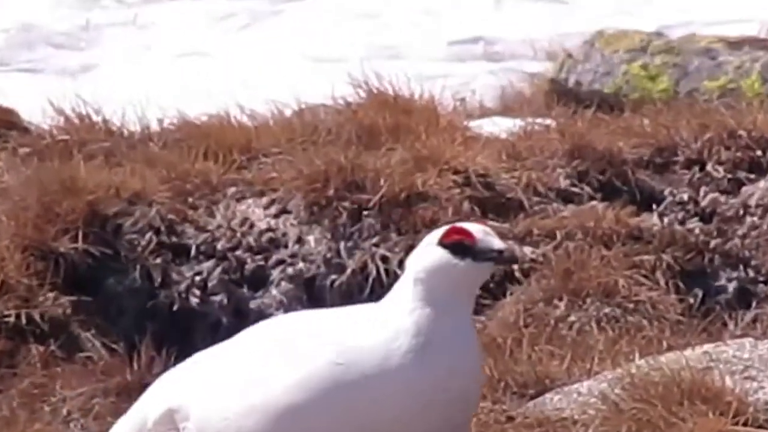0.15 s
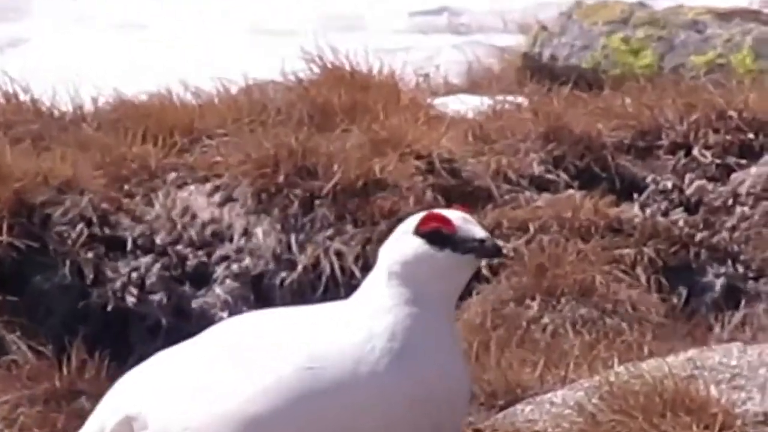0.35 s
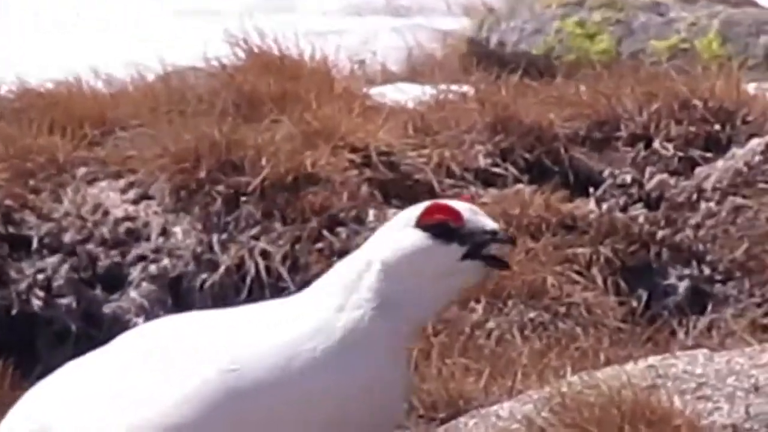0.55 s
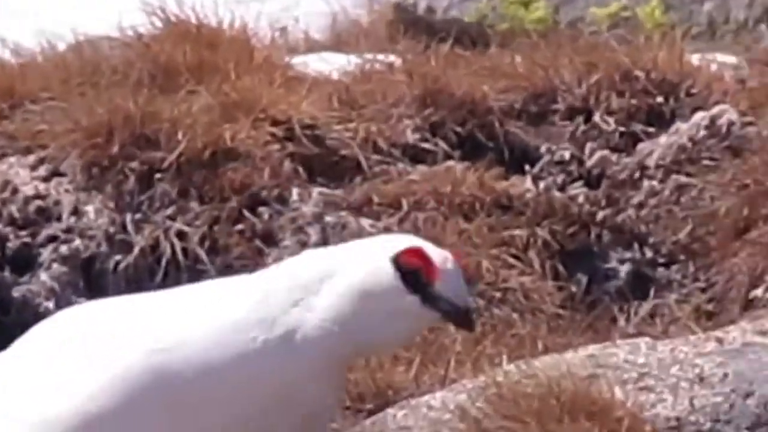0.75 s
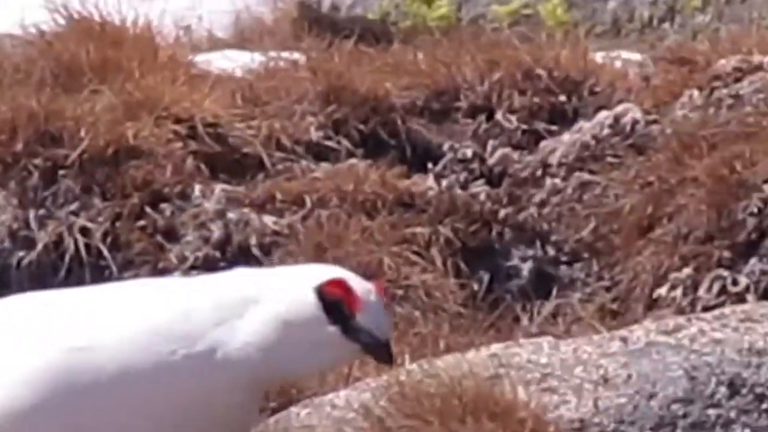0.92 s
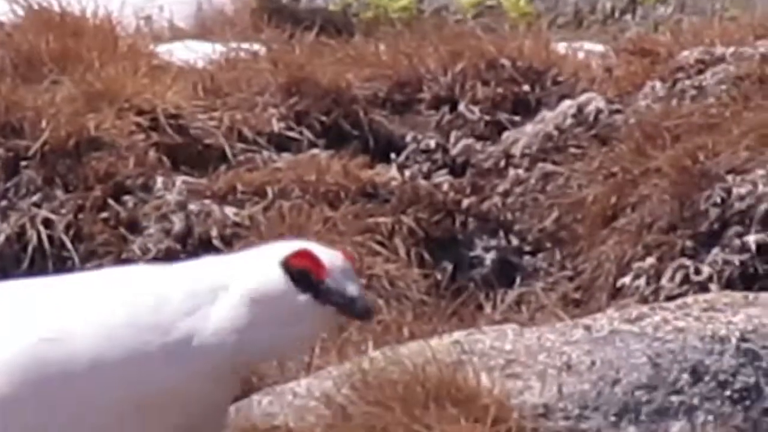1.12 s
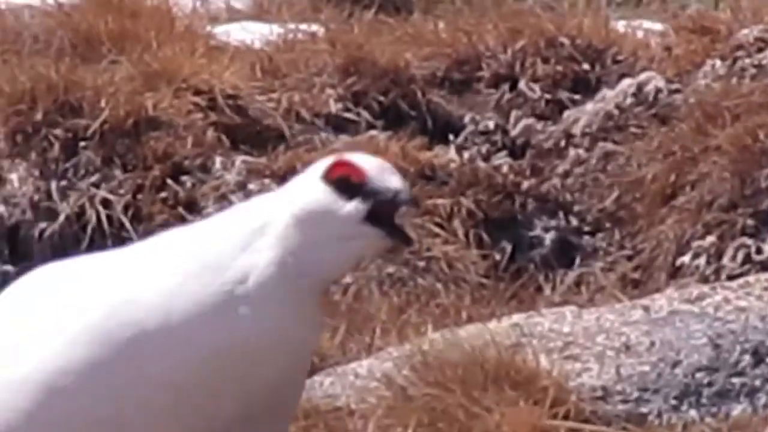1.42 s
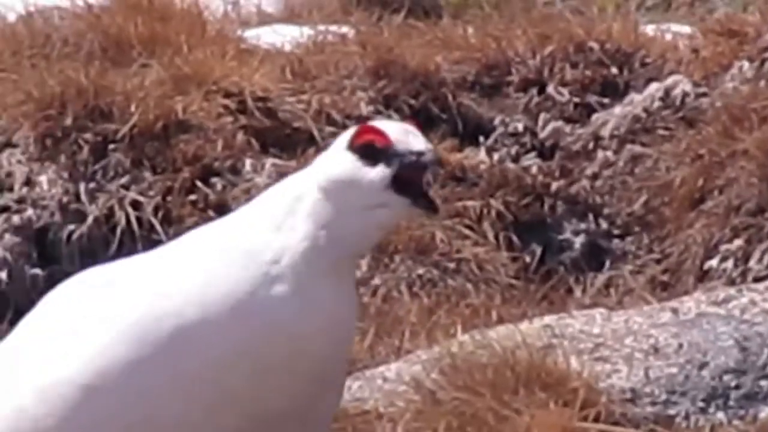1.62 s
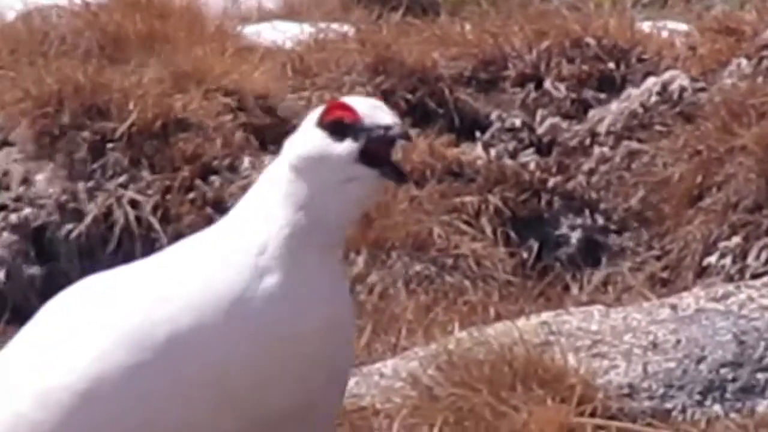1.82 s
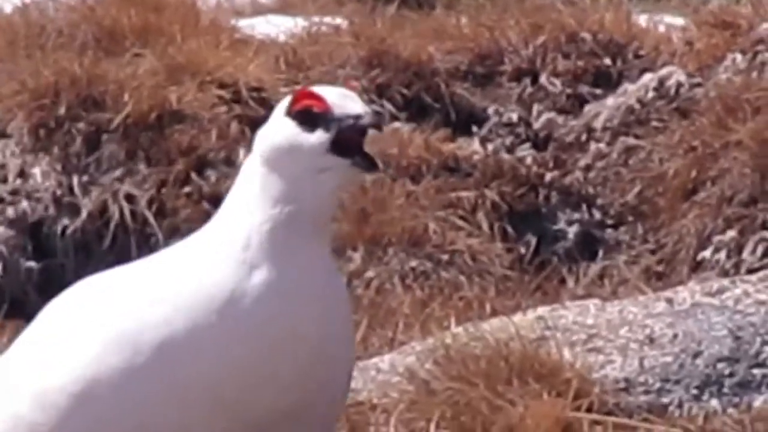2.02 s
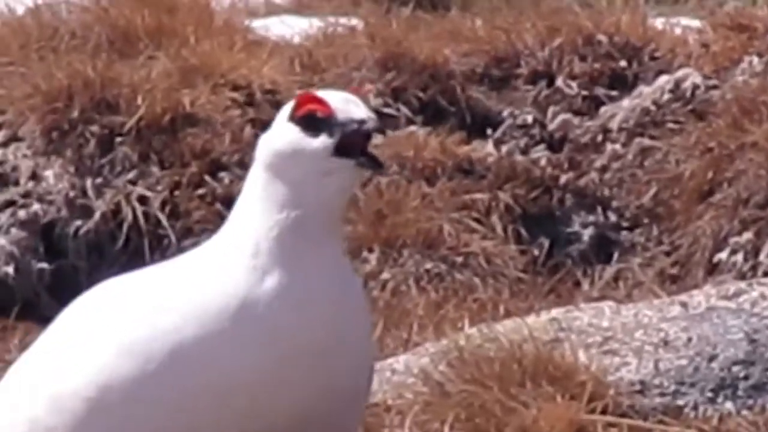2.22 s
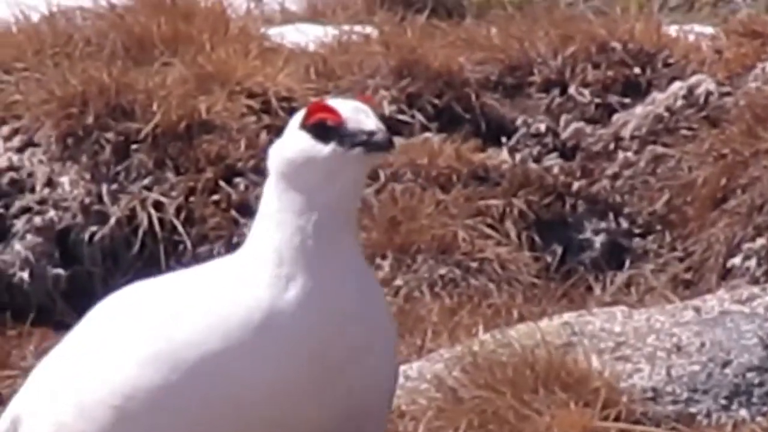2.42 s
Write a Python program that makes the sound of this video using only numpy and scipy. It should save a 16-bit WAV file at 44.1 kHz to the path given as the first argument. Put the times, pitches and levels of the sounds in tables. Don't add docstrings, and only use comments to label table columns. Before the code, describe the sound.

A ptarmigan's dry, guttural clicking call over soft wind hiss on an open slope. Low wind buffets hit the microphone around 0.2 s; fingers rub the plastic housing, which snaps very loudly at 0.4 s with a brief hum. A croak of separate throat clicks runs 0.8-1.55 s, weak midway, with faint grass rustles. From 1.68 to 2.4 s a steady, hollow rattle swells, rises, then stops, leaving hiss.

```python
import sys
import numpy as np
from scipy import signal
from scipy.io import wavfile
from scipy.ndimage import uniform_filter1d

SR = 44100
rng = np.random.default_rng(int(sys.argv[2]) if len(sys.argv) > 2 else 0)


def volts_from_decibels(level):
    exponent = np.asarray(level, float) / 20
    return 10 ** exponent


def persist_wave(psi):
    counts = np.round(np.clip(psi, -1, 1) * 32767).astype(np.int16)
    wavfile.write(sys.argv[1], SR, np.atleast_2d(counts).T)


N = 112454

# freq_hz, level_db (per Hz)
HISS_SPECTRUM = [(18, -21.5), (30, 0.5), (278, -14), (308, -7), (352, -14.5), (469, -14), (695, -17),
                 (9040, -36.5), (15700, -47.5)]
# freq_hz, likeness (-1 opposed .. 1 same)
PORT_LIKENESS = [(60, -0.66), (180, -0.9), (550, -0.511), (1650, -0.29), (4970, 0.03), (15000, 0.13)]
# start_s, length_s, level_db, pitch_hz, port (-1 right .. 1 left)
GUSTS = [(.186, .13, -20.5, 48, -.85), (.201, .14, -23, 108.5, -.8), (.218, .033, -13, 122.5, -.97),
         (.207, .041, -19.5, 44.5, -.62), (.327, .037, -26.5, 132, .73), (.867, .016, -35, 740, .69),
         (.878, .027, -32, 146, .5), (.388, .03, -30, 70, .86), (.978, .029, -27, 97, .59),
         (1.289, .092, -36.5, 60, -.39), (1.315, .014, -42, 110, .6), (1.675, .062, -32, 60, -.35),
         (1.757, .035, -30, 100, -.31), (2.012, .044, -44, 59.5, .88), (2.261, .079, -39, 65.4, .1),
         (0.0, .068, -44, 40, -.013), (.886, .009, -35, 300, .6), (.873, .02, -43, 620, .6)]
# pitch_hz, level_db, t60_s, right_port_phase_turns
SHELL_MODES = [(575, -19, 0.021, 0.39), (671, -7, 0.021, 0.45), (860, -5, 0.017, 0.45),
               (1150, -17, 0.027, 0.46), (1393, 0.5, 0.012, 0.29), (1579, -4.5, 0.019, 0.22),
               (2126, -13, 0.012, 0.22), (2490, -11.5, 0.01, 0.26), (3290, -14.5, 0.0086, 0.085),
               (4230, -11.5, 0.00885, 0.12), (4785, -11, 0.013, 0.67), (7450, -36, .008, 0.54),
               (9730, -26, 0.011, 0.18), (11610, -19, 0.0055, 0.24)]
# start_s, level_db, brightness_db_per_octave
SNAPS = [(.4047, -10.5, 5.5), (.4055, 6, -1.1), (.4128, -12, -5), (.4255, -31.5, -10), (0.3933, -17, -1),
         (0.3969, -18.5, -2), (.4, -19.5, 5), (.4025, -19.5, 3.5), (.4092, -12, 0.5), (.4165, -19.5, -12),
         (.643, -36, -1), (1.021, -36, -2.5), (.082, -40.5, 0)]
# time_s, level_db
HAND_CREEP = [
    (0.201, -56.5),
    (0.239, -45),
    (0.319, -42),
    (.33, -49),
    (.345, -41.5),
    (0.384, -45.5),
    (0.39, -37.5),
    (.404, -20.5),
    (0.4156, -34),
]
# pitch_hz, width_hz, level_db
GRIP_RINGS = [(674, 67, 29), (1378, 74, 13), (2400, 86, -5.5), (3800, 65, -18), (4200, 79, -19),
              (4520, 58, -20)]
# pitch_hz, width_hz, level_db
AFTER_RINGS = [(990, 49, -38.5), (1580, 90, -43), (1709, 81, -36.5), (868, 30, -52.5), (2330, 60, -46.5)]
# start_s, level_db, length_s, brightness_db_per_octave
SLIPS = [(0.2257, -43.5, .005, 0.5), (.251, -46, .006, -5), (0.289, -39, 0.0042, -0.5),
         (.307, -47, .008, 2), (0.332, -48.5, .004, 0), (.343, -45.5, .006, 0), (0.356, -42.5, .008, -2.5),
         (.368, -44, .006, -5), (0.377, -43.5, .005, -3)]
# pitch_hz, width_hz, level_db
SLIP_RINGS = [(1405, 260, 0), (2380, 120, -9), (4300, 400, -13.5), (800, 330, -5.5)]
CROAK_CLICKS = [0, 1, 2, 3, 8, 14, 16, 17, 18, 19]
# start_s, effort_db, throat_hz, beak_hz, beak_ring_db, brightness_db
CROAK = [
    (0.778, -48, 1110, 2267, 8.5, 0),
    (0.8126, -29.5, 1080, 2170, 3, -12),
    (0.8497, -34.5, 924, 2000, -4, -10),
    (0.8938, -40, 900, 1970, -11, -5),
    (1.118, -49.5, 890, 1730, -5, -3),
    (1.362, -45.5, 880, 1740, -7, -3),
    (1.4373, -38, 1105, 1840, -9, 2),
    (1.472, -34, 1150, 1900, -13, 8),
    (1.506, -31.5, 1227, 2270, -0.5, 8),
    (1.539, -37.5, 1210, 2290, 1, 10),
]
# start_s, effort_db, throat_hz, beak_hz, beak_ring_db, brightness_db
RATTLE = [(1.6792, -33, 1180, 2224, 3, -3), (1.7046, -31.5, 1130, 2244, 2, 3),
          (1.7347, -33.5, 1150, 2240, 1, 8), (1.7651, -34, 1150, 2240, -4, -1),
          (1.7962, -33.5, 1150, 2210, -10, -6), (1.8254, -32.5, 1150, 2250, -8, 7),
          (1.8547, -33, 1180, 2200, -10, -2), (1.8828, -31.5, 1194, 2220, -7, 1),
          (1.9108, -30, 1170, 2270, -4, 5), (1.9387, -30.5, 1180, 2220, 1, -2),
          (1.9661, -30, 1230, 2285, 4.5, -2), (1.993, -30, 1245, 2350, 6, -1),
          (2.02, -28.5, 1243, 2293, 5.5, -10), (2.0477, -28, 1285, 2337, 7.5, -9),
          (2.073, -28.5, 1300, 2344, 6.5, -7), (2.101, -27, 1336, 2285, 7.5, -6),
          (2.1274, -26.5, 1320, 2270, 5.5, 5), (2.1539, -26, 1326, 2310, 5, -7),
          (2.1798, -28, 1373, 2306, 4.5, 1), (2.2077, -26.5, 1320, 2290, 4, -4),
          (2.235, -27, 1350, 2330, 3.5, 6), (2.263, -26.5, 1324, 2335, 2.5, 6.5),
          (2.2916, -28, 1300, 2280, 2, 1), (2.3207, -27.5, 1320, 2195, 5.5, 4),
          (2.3492, -28, 1263, 2246, 6, 3), (2.3796, -30, 1266, 2240, 7, 6)]
# start_s, length_s, level_db, pitch_hz
RUSTLES = [(1.154, 0.018, -54.5, 3540), (1.153, 0.022, -54.5, 2180), (1.155, 0.012, -56.5, 4300),
           (1.171, 0.0157, -52.5, 3517), (1.175, 0.018, -57, 2280), (1.287, 0.012, -51, 3590),
           (1.281, 0.023, -59.5, 2460), (1.285, 0.0095, -87, 5040)]


def read(points, hz):
    f, value = np.transpose(points)
    return np.interp(np.log(hz + 1), np.log(f + 1), value)


def evened(x):
    return x / np.sqrt(np.mean(x ** 2) + 1e-20)


def add(mix, s, sound):
    part = mix[..., round(s * SR):][..., :sound.shape[-1]]
    part += sound[..., :part.shape[-1]]


def ring(t, hz, db, t60):
    phase = 2 * np.pi * np.cumsum(hz * np.ones(len(t))) / SR
    return volts_from_decibels(db - 60 * t / t60) * np.sin(phase)


def band(x, hz, width):
    return signal.lfilter(*signal.iirpeak(hz, max(hz / width, .3), SR), x)


def sharp_band(x, hz, width):
    return band(band(x, hz, width), hz, width)


def hiss():
    frames, hz = N // 256 + 5, np.fft.rfftfreq(1024, 1 / SR)
    a, b, c, d, patches = rng.standard_normal((frames, 513, 5)).T
    patches = uniform_filter1d(patches, size=10, axis=0)
    patches = evened(uniform_filter1d(patches, size=8, axis=1))
    lumpy_db = 0.71 + 1.13 / (1 + (hz / 200) ** 2)
    same = np.clip(read(PORT_LIKENESS, hz), -.98, .98)[:, None]
    mid = a + 1j * b
    side = (c + 1j * d) * np.sqrt((1 - same) / (1 + same))
    level_db = read(HISS_SPECTRUM, hz)[:, None] + lumpy_db[:, None] * patches
    z = np.array([mid, side]) * volts_from_decibels(level_db)
    mid, side = signal.istft(z, nperseg=1024, noverlap=768)[1][:, :N]
    scale = volts_from_decibels(-47.5) / np.sqrt(np.mean(mid ** 2))
    return scale * np.array([(mid + side) * volts_from_decibels(0.9), (mid - side) * volts_from_decibels(-0.6)])


def gusts():
    widen = 0.52
    out = np.zeros((2, N))
    for s, length, db, hz, port in GUSTS:
        t = np.arange(0, length, 1 / SR)
        low = sharp_band(rng.standard_normal(16000), hz, 0.49 * hz)
        low = low[6000:][:len(t)]
        swell = np.sin(np.pi * (t / length) ** 0.73) ** 2
        lump = volts_from_decibels(db) * evened(low * swell)
        left, right = (1 + port) / 2, (1 - port) / 2
        gains = [1, -1]
        if abs(port) > .3:
            gains = [left - widen * right, right - widen * left]
        add(out, s, np.outer(gains, lump))
    return out


def snaps():
    rise_s = 0.00027
    out, t = np.zeros((2, N)), np.arange(3000) / SR
    for s, db, tilt_db in SNAPS:
        luck = rng.standard_normal((len(SHELL_MODES), 3))
        tick = rng.standard_normal((2, 3000)) * np.exp(-t / 0.00036)
        sound = volts_from_decibels(-22.0 + 1.5 * tilt_db) * tick
        for (hz, mode_db, t60, turns), draw in zip(SHELL_MODES, luck):
            level_db = mode_db + tilt_db * np.log2(hz / 1450) + 2 * draw[0]
            pitch_hz = hz * (1 + 0.018 * draw[1])
            port_phase = np.array([[0], [turns]])
            wave = np.sin(2 * np.pi * (pitch_hz * t + 0.3485 * draw[2] + port_phase))
            sound = sound + volts_from_decibels(level_db - 60 * t / t60) * wave
        add(out, s, volts_from_decibels(db) * sound * np.minimum(t / rise_s, 1) * volts_from_decibels([[1.6], [-1.6]]))
    return out


def creeping_hand():
    grit = rng.standard_normal((2, N))
    unevenness = uniform_filter1d(rng.standard_normal(N), size=200) * np.sqrt(200)
    grit = grit * volts_from_decibels(1.4 * unevenness)
    rub = sum(volts_from_decibels(db) * band(grit, hz, 150 + 2 * width) / np.sqrt(width)
              for hz, width, db in GRIP_RINGS)
    skin = band(band(grit, 2200, 2600), 1700, 2600)
    time, level = np.transpose(HAND_CREEP)
    loudness_db = np.interp(np.arange(N) / SR, time, level, -120, -120)
    return evened(evened(rub) + .12 * evened(skin)) * volts_from_decibels(loudness_db)


def after_ring():
    start_s, t60_s = .419, 0.23
    out, t = np.zeros((2, N)), np.arange(12000) / SR
    for hz, width, db in AFTER_RINGS:
        hum = evened(sharp_band(rng.standard_normal((2, 12000)), hz, width))
        add(out, start_s, volts_from_decibels(db - 60 * t / t60_s) * hum)
    return out


def housing():
    shell = snaps() + creeping_hand() + after_ring()
    return signal.sosfilt(signal.butter(3, 474, "highpass", fs=SR, output="sos"), shell)


def slips():
    out, t = np.zeros((2, N)), np.arange(1500) / SR
    for s, db, length, tilt_db in SLIPS:
        scrape = rng.standard_normal((2, 1500)) * (t / length) * np.exp(-2 * t / length)
        scrape = np.array([scrape[0] * 1.3, .6 * scrape[0] + .5 * scrape[1]])
        sound = np.zeros((2, 1500))
        for hz, width, ring_db in SLIP_RINGS:
            level_db = ring_db + tilt_db * np.log2(hz / 1450)
            sound += volts_from_decibels(level_db) * evened(sharp_band(scrape, hz, width))
        add(out, s, volts_from_decibels(db - 5) * sound)
    return out


def click(db, throat_hz, beak_hz, beak_db, bright_db, luck):
    wobble_hz, puff_s, rise_s = 20, 0.00035, 0.0011
    t = np.arange(2400) / SR
    noise = luck[5:]
    sag = np.exp(-t / 0.0054)
    strain_hz = throat_hz - 1150
    beak_hz = beak_hz + wobble_hz * luck[1]

    throat = ring(t, throat_hz, -0.2 * max(-strain_hz, 0), 0.019)

    beak_t60 = 0.019 * max(1 + .05 * beak_db, .5)
    rasp = 1 + .2 * evened(band(noise, 460, 560))
    beak = ring(t, beak_hz * (1.1147 - .19 * sag), beak_db, beak_t60) * rasp

    gape = ring(t, 0.818 * beak_hz, -5.5 + 0.0388 * strain_hz + luck[2], 0.0083)

    upper_hz = (throat_hz + beak_hz + 10 * wobble_hz * luck[2]) * (1.09 - 0.15 * sag)
    upper = ring(t, upper_hz, -12 + 2 * luck[3], 0.015)

    chirp_hz = 3350 + 2.2 * strain_hz + 3 * wobble_hz * luck[3]
    chirp_sweep = 1 - 0.77 * np.exp(-t / 0.00079)
    chirp = ring(t, chirp_hz * chirp_sweep, 0.5 - 1.8 * max(beak_db - 2.5, 0), 0.011)

    nasal_hz = 5000 + 2.2 * strain_hz + 6 * wobble_hz * luck[1]
    nasal = ring(t, nasal_hz, -16 + bright_db, 0.0059)

    tube = throat + beak + gape + upper + chirp + nasal
    snap = volts_from_decibels(-21 + bright_db) * noise * np.exp(-t / 0.00097)
    puff = volts_from_decibels(-4.5) * (t / puff_s) * (2 - t / puff_s) * np.exp(1 - t / puff_s)
    onset = np.sin(np.pi / 2 * np.minimum(t / rise_s, 1))
    return volts_from_decibels(db + .3 * luck[0]) * ((tube + snap) * onset + puff)


def bird():
    left_db, lag_s, ground_db, ground_t60 = 1.5, .00004, -14, 0.07
    voice = np.zeros(N)
    for numbers, rows in ((CROAK_CLICKS, CROAK), (np.arange(len(RATTLE)), RATTLE)):
        luck = rng.standard_normal((numbers[-1] + 1, 2406))
        for k, draw in enumerate(luck):
            s, *rest = [np.interp(k, numbers, col) for col in np.transpose(rows)]
            add(voice, s + .0001 * draw[0], click(*rest, draw[1:]))
    t = np.arange(5000) / SR
    tail = rng.standard_normal((2, 5000)) * volts_from_decibels(-60 * t / ground_t60) * (t > .003)
    tail = tail / np.linalg.norm(tail[0])
    wet = signal.fftconvolve(voice[None], tail, axes=1)[:, :N]
    late = np.interp(np.arange(N) - lag_s * SR, np.arange(N), voice)
    direct = np.array([voice * volts_from_decibels(left_db / 2), late * volts_from_decibels(-left_db / 2)])
    return direct + volts_from_decibels(ground_db) * wet


def rustles():
    out = np.zeros((2, N))
    for s, length, db, hz in RUSTLES:
        t = np.arange(0, length, 1 / SR)
        fuzz = band(band(rng.standard_normal((2, 3000)), hz, 494), hz, 470)
        a, b = fuzz[:, 500:500 + len(t)]
        ports = np.array([a + 0.74 * b, 0.42 * a - 0.36 * b])
        swell = np.sin(np.pi * (t / length) ** 0.47)
        add(out, s, volts_from_decibels(db) * evened(ports * swell))
    return out


def scene():
    return bird() + hiss() + gusts() + housing() + rustles() + slips()


def roll_off(x):
    return signal.sosfilt(signal.butter(12, 15820, fs=SR, output="sos"), x)


def record(dry):
    threshold_db, duck_share, recover_db_per_s, delay_s = -15.5, 0.68, 19.5, 0.0046
    dry = signal.sosfilt(signal.butter(3, 15200, fs=SR, output="sos"), dry)
    power = abs(uniform_filter1d((dry ** 2).mean(0), size=200))
    power_db = 10 * np.log10(power + 1e-12)
    fall = np.arange(N) * recover_db_per_s / SR
    held_db = np.maximum.accumulate(power_db + fall) - fall
    over_db = uniform_filter1d(np.maximum(held_db - threshold_db, 0), size=300)
    late_db = np.interp(np.arange(N) - delay_s * SR, np.arange(N), over_db)
    mix = np.clip(dry / volts_from_decibels(duck_share * late_db), -1, 1)
    return roll_off(mix)


dry = scene()
out = record(dry)
persist_wave(out)
```